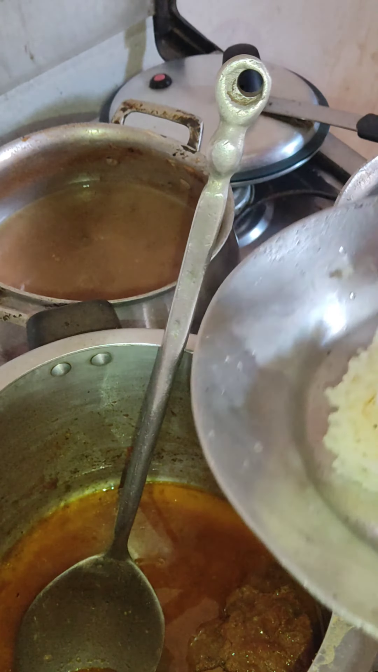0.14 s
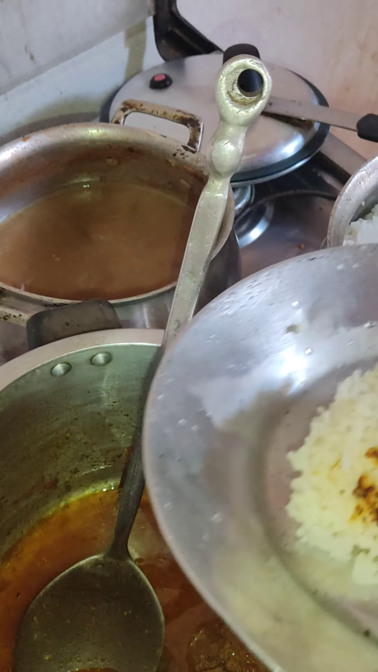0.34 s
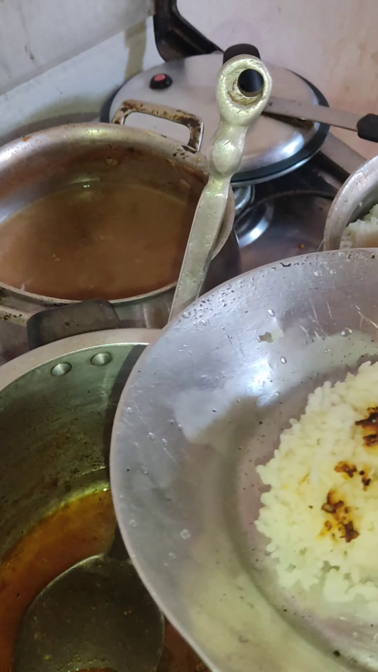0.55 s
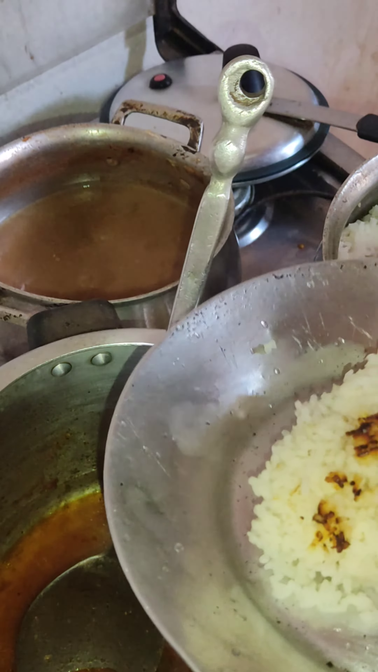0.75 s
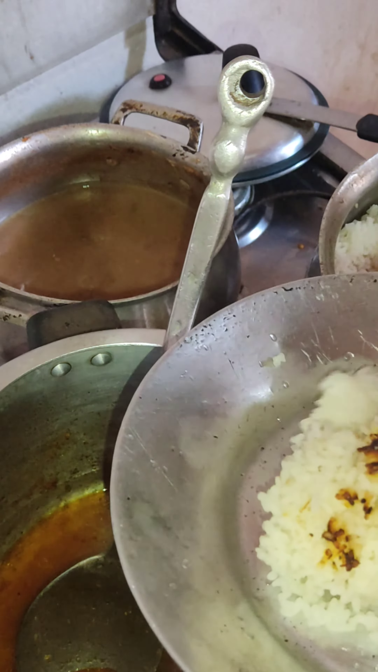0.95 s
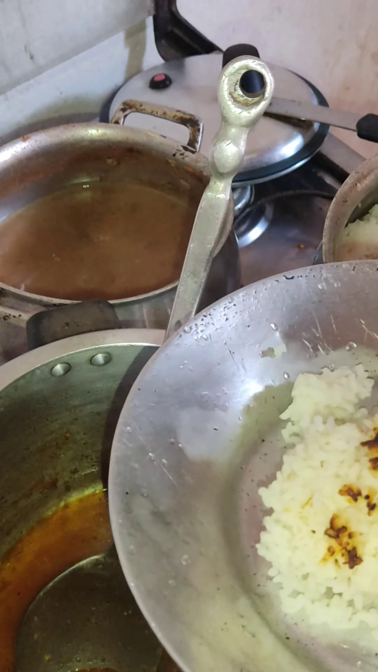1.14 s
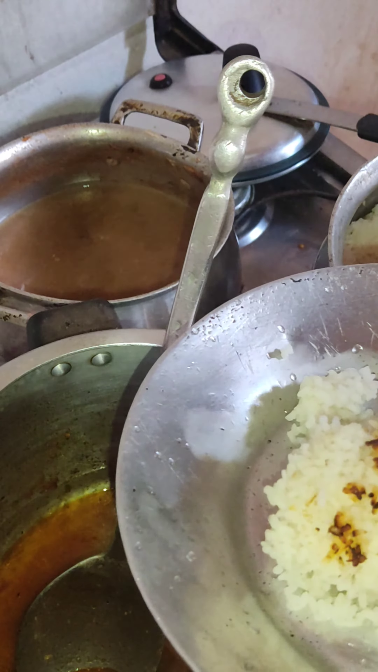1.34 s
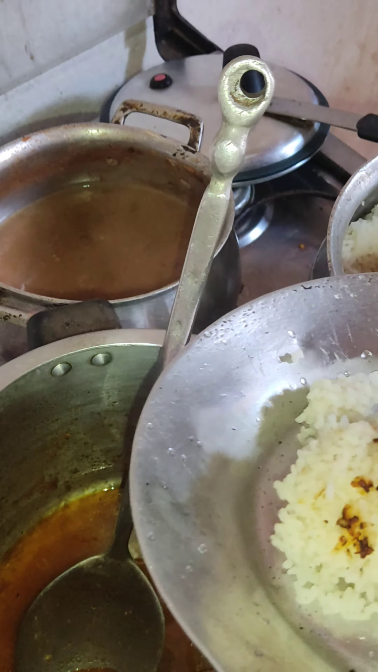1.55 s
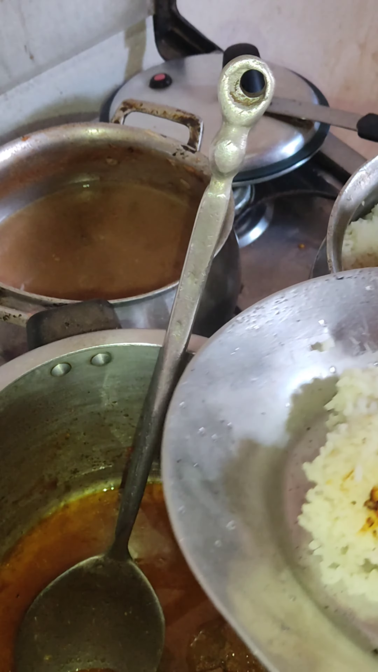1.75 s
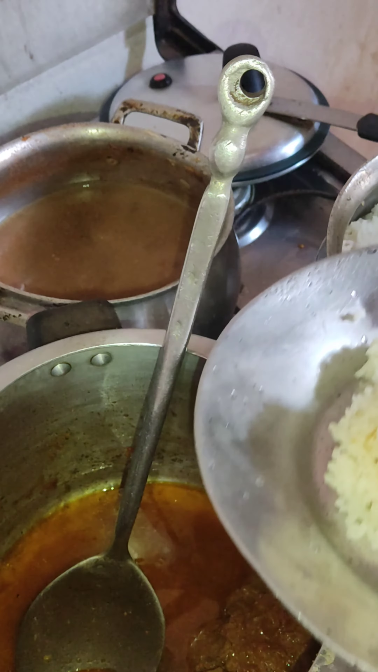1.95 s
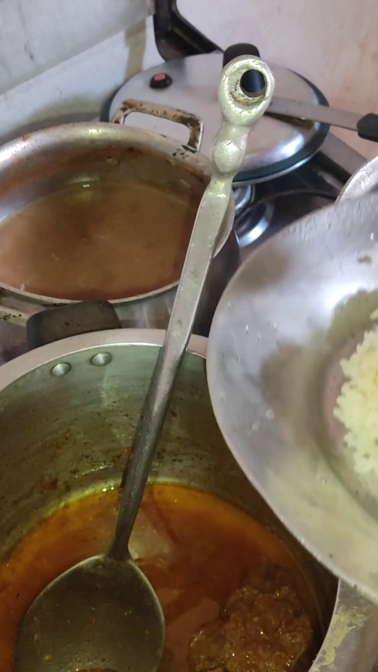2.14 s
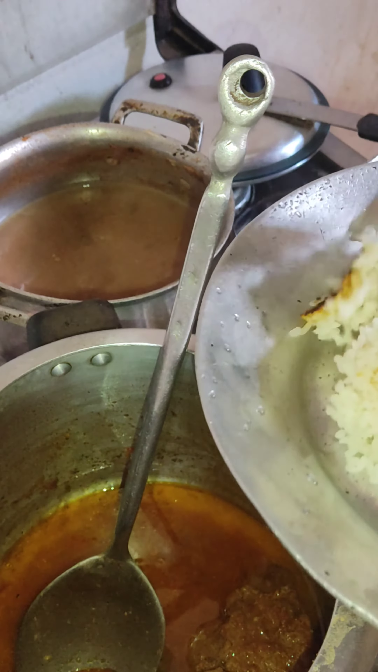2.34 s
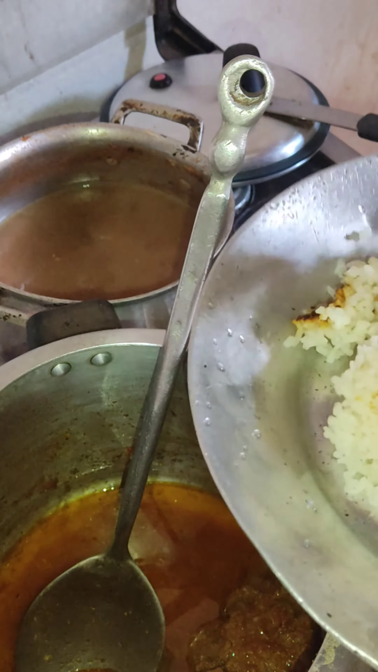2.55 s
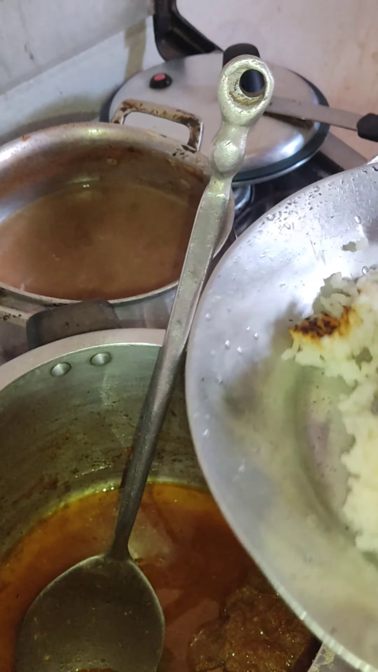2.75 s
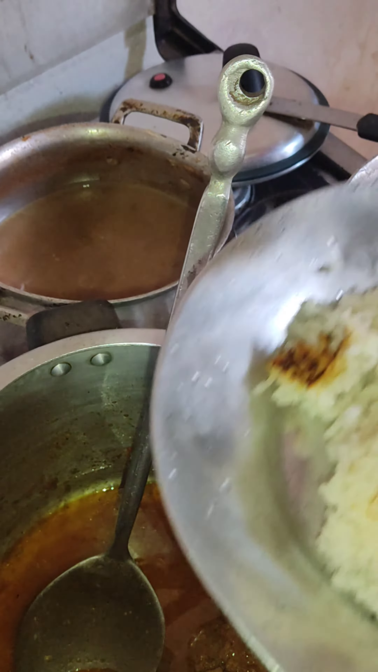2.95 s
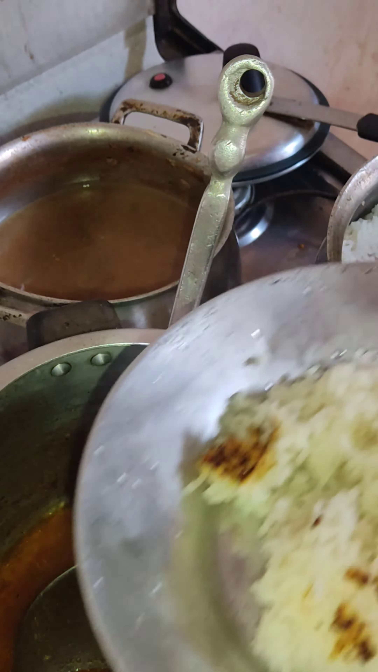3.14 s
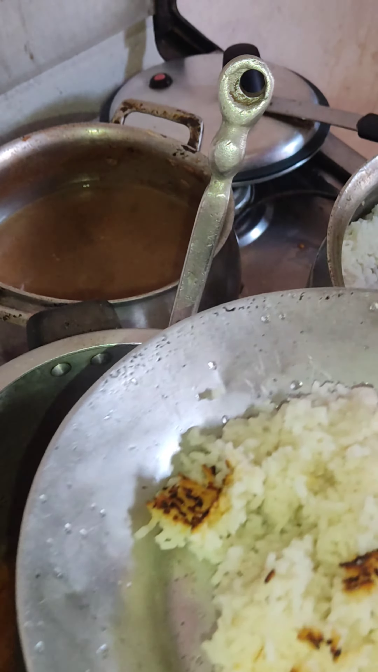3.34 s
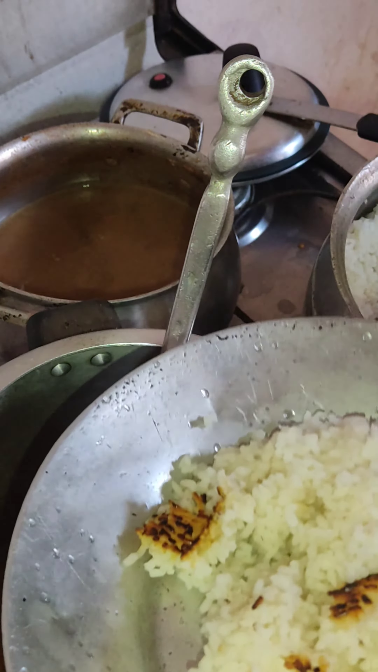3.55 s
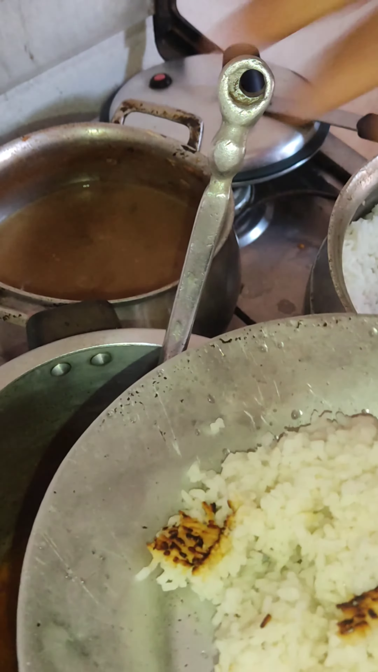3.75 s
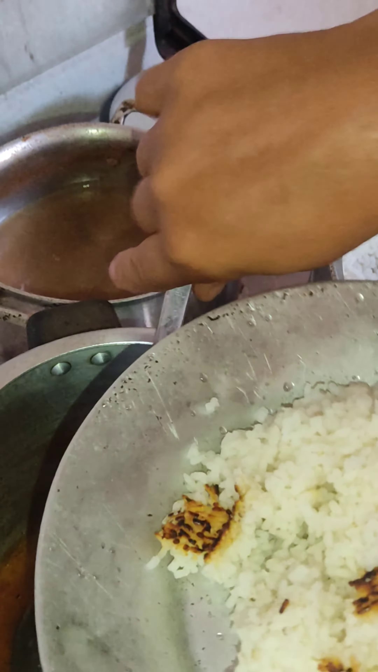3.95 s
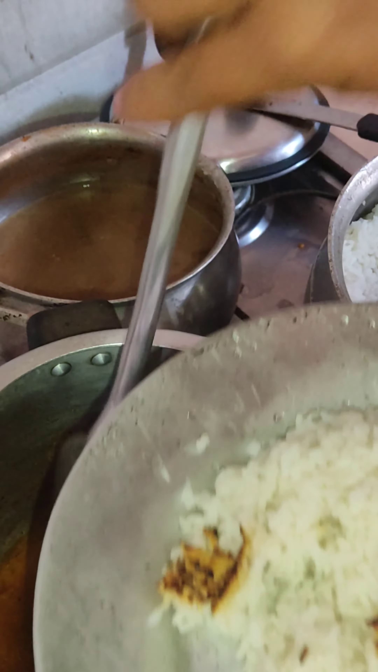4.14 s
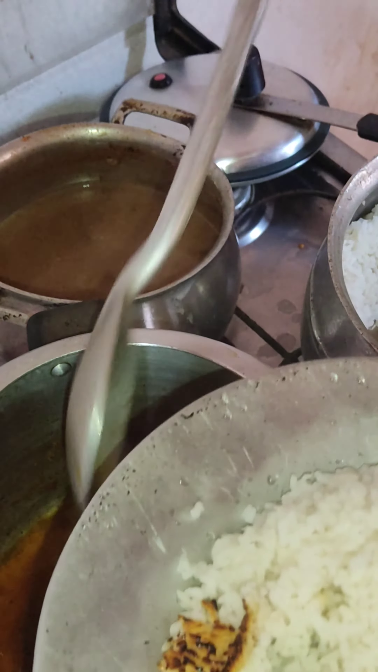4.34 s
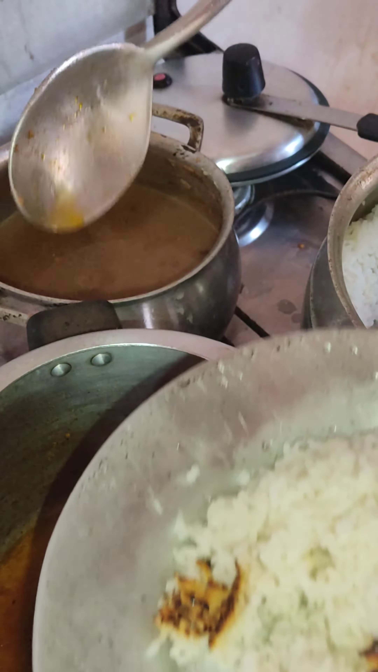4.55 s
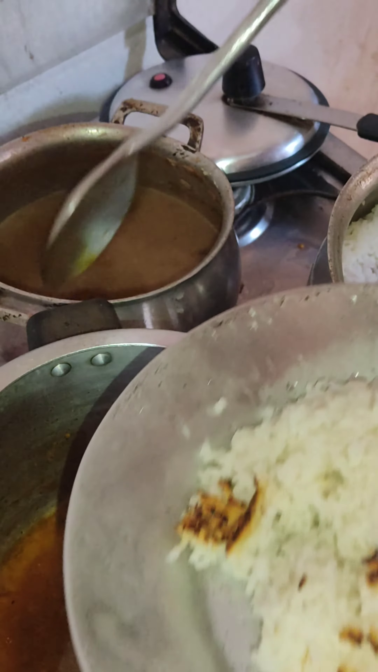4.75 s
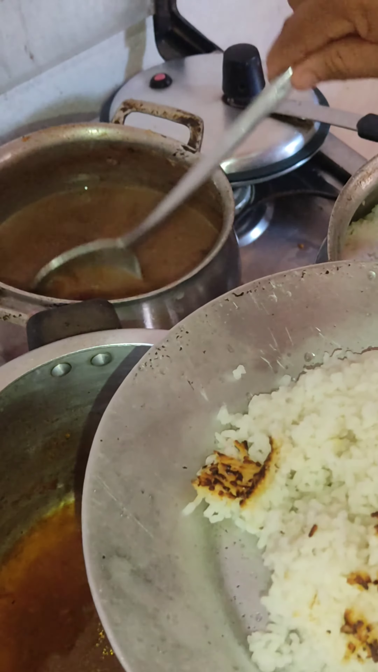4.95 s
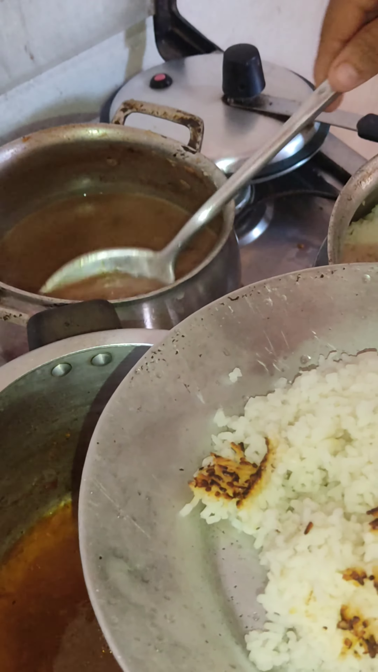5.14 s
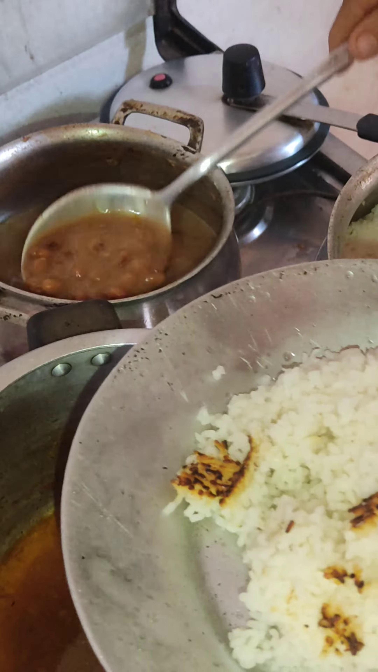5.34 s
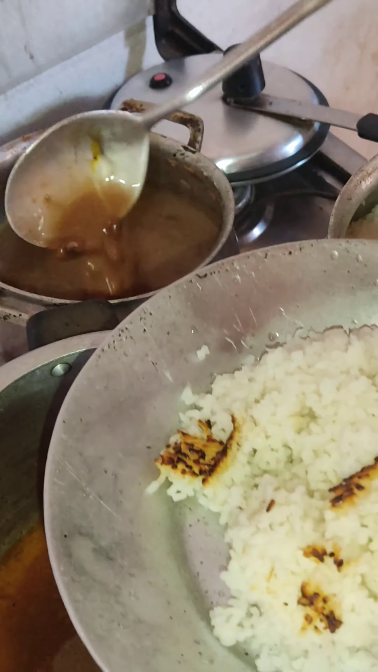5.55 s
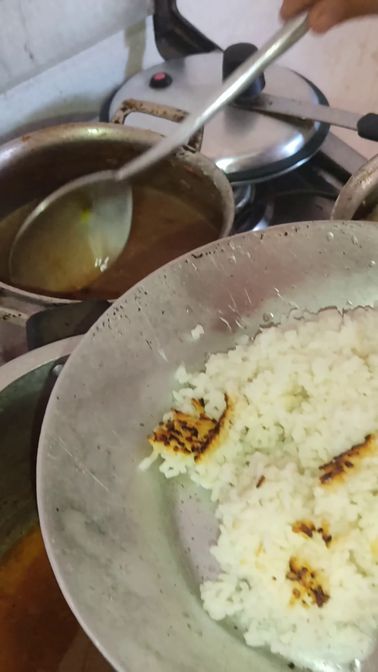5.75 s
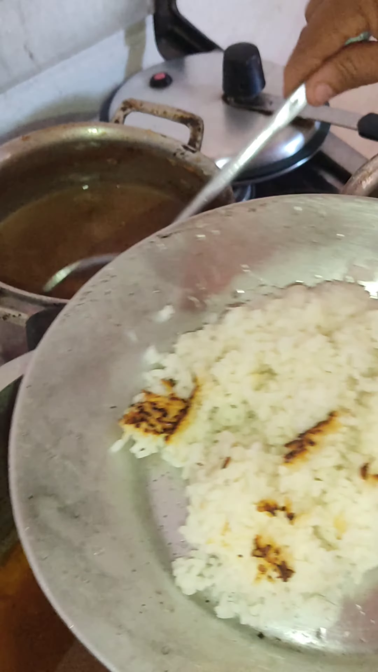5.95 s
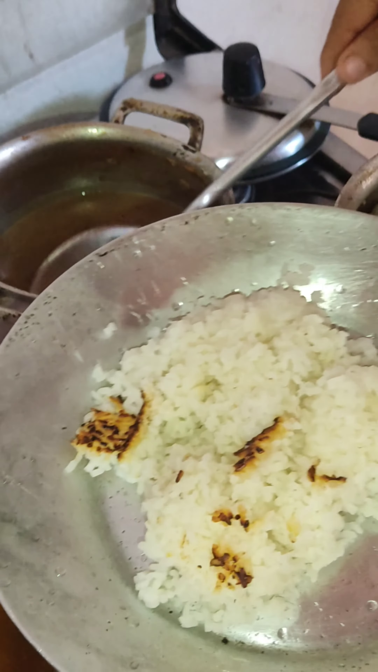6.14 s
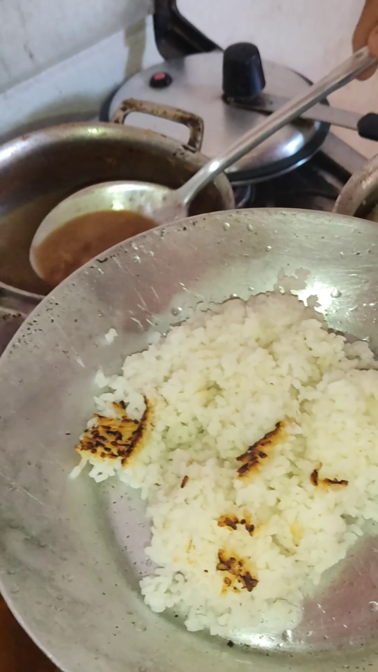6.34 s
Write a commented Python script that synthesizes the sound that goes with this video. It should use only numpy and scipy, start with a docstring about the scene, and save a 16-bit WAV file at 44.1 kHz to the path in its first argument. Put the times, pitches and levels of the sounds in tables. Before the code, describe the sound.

In a small tiled kitchen with a low compressor hum, pans thud softly and shift on the stove while a spoon scrapes faintly. A plate is lightly touched and rice is knocked loose. A bright cluster of spoon clinks rings out, a pan rocks quickly to rest, then a ladle strikes a pot hard, followed by the pot wall and small rim ticks. Close stereo microphone, short bright room tail.

```python
"""A home kitchen: a serving spoon scrapes rice and clinks on a pot, a plate is touched, a ladle rocks its pan,
strikes a stew pot and ticks on the rim. Pans thud and drag on the stove, something squeaks, steam whistles
and a compressor hums. Cookware is beating resonances, resonance-coloured clatter and a raw snap; friction,
steam and air are shaped grainy noise; hum, squeak and pot rings are sines. A tiled-room tail follows the blows."""
import sys
import numpy as np
from scipy import signal
from scipy.fft import rfft, irfft, next_fast_len
from scipy.io import wavfile
from scipy.ndimage import map_coordinates

SR = 44100
rng = np.random.default_rng(int(sys.argv[2]) if len(sys.argv) > 2 else 0)


def transcribe(u):
    """Save the signal u as a 16-bit wav file named by the first command-line argument.

    u: samples, shape (n,) or (channels, n), limited to [-1, 1]; the rate is SR.
    q: integer samples, one column per channel.
    """
    v = np.clip(np.atleast_2d(u).T, -1, 1)
    q = np.round(v * 32767).astype(np.int16)
    wavfile.write(sys.argv[1], SR, q)


N = 281799

# Wavering compressor tones: pitch_hz, level_db
HUM_TONES = [(59.2, -73.5), (118, -90), (527.6, -80), (585.5, -88.5), (701, -90)]
# The strongest compressor tone as it swells: time_s, level_db (before a 5.5 dB lift)
DRONE_SWELL = [(0, -76), (1.3, -102), (1.7, -76.5), (2.5, -76.5), (3.4, -75), (4.5, -78), (5.5, -84.5),
               (6.39, -83.5)]
# Breathy whistles of steam: start_s, rise_s, hold_s, level_db
STEAM_WHISTLES = [(2.002, 0.032, 0.034, -73), (4.474, 0.035, .04, -69)]
# Noise colours of room air and steam: freq_hz, relative_level_db
AIR_COLOUR = [(9, -20.5), (15, 4.5), (68, -24.5), (90, -18), (120, -16.5), (382, -20.5), (685, -25.5),
              (816, -29.5), (1160, -33.5), (3000, -40), (5500, -41.5), (7800, -36), (9300, -40),
              (10200, -51), (12500, -59), (13500, -75.5), (16000, -77.5)]
STEAM_COLOUR = [(3000, -120), (4300, -25), (4900, -12), (5200, -11.5), (5500, -10.5), (6200, -60),
                (8000, -120)]

# The squeak's envelope: start_s, rise_s, hold_s, fade_db_per_s
SQUEAK_SHAPE = (0.34, 0.0071, 0.15, 670)
# The squeak's harmonics: multiple_of_pitch, relative_level_db
SQUEAK_HARMONICS = [(1, 0), (2, -5), (3, -15), (4, -18), (5, -18)]

# Strokes of metal on metal and rice: start_s, rise_s, hold_s, hiss_db, rasp_db
SCRAPE_STROKES = [(0.172, 0.011, 0.051, -71, -70.5), (0.32, 0.02, 0.13, -74, -74),
                  (0.588, 0.0185, 0.099, -71, -82), (0.92, 0.018, 0.09, -66, -64),
                  (1.013, 0.023, 0.092, -66, -63), (1.262, .006, 0.0086, -66.5, -69),
                  (2.109, 0.042, 0.045, -51.5, -56), (2.526, 0.029, 0.085, -63, -76),
                  (2.833, 0.014, 0.063, -65, -66.5), (3.328, 0.013, 0.19, -51.5, -60.5),
                  (3.959, 0.011, 0.004, -54, -60), (4.006, 0.023, 0.01, -59.5, -62.5),
                  (4.053, 0.026, 0.18, -89, -64), (4.24, 0.0048, 0.0073, -57, -76),
                  (5.366, 0.045, 0.07, -63, -59.5), (5.618, 0.012, 0.051, -62, -75.5),
                  (5.85, 0.12, 0.043, -66.5, -73), (6.146, 0.014, 0.2, -71.5, -70.5)]
# Pans shifting on the grate: start_s, rise_s, hold_s, fade_db_per_s, rumble_db, boom_db
PAN_DRAGS = [(0.603, 0.0076, 0.0088, 65, -53.5, -57), (0.888, 0.013, 0.047, 95, -60.5, -60.5),
             (1.01, 0.015, 0.029, 90, -54.5, -72), (1.127, 0.016, 0.02, 88, -62.5, -58.5),
             (1.325, 0.033, 0.019, 131, -60, -68), (1.46, 0.026, 0.0076, 173, -61, -61.5),
             (3.489, 0.02, 0.039, 118, -49, -43.5), (3.568, 0.026, 0.051, 103, -53.5, -57.5),
             (4.003, 0.011, 0.12, 27, -51, -65.5), (4.928, 0.022, 0.013, 140.5, -42.5, -48.5),
             (5.045, 0.02, 0.008, 74, -49, -60)]
# The grate under each near-edge landing: rise_s, hold_s, fade_db_per_s
GRATE_THUMP = (.008, .02, 200)
# Friction colours: freq_hz, relative_level_db
HISS_COLOUR = [(1760, -31), (3000, -4), (4860, -7.5), (5040, -6), (6300, -3.5), (8820, 2.5), (10000, -14),
               (14400, -28.5), (15700, -36.5), (16000, -57.5)]
RASP_COLOUR = [(350, -23), (600, -9.5), (1100, -6.5), (1400, -5), (1800, -6), (2250, -6), (2750, -5),
               (3200, -13.5), (4000, -13.5), (5200, -32.5), (8800, -120)]
RUMBLE_COLOUR = [(110, -44), (160, -3.5), (200, 2), (278, 1.5), (323, -8), (440, -5.5), (900, -18),
                 (1300, -36.5), (2500, -120)]
BOOM_COLOUR = [(30, -79.5), (70, -30.5), (95, -7), (115, 5.5), (140, -4.5), (185, -27.5), (400, -91.5)]

# Likeness of the left and right noise: freq_hz, likeness (0 to 1)
SIDE_LIKENESS = [(30, 0.053), (70, 0.92), (150, 0.82), (300, 0.7), (700, 0.11), (1200, 0.073),
                 (2000, 0.011), (10000, 0.019)]
# How long the tiled room rings, before the tail bends down faster: freq_hz, decay_60db_s
ROOM_DECAY = [(100, 0.16), (500, 0.72), (1200, 0.71), (2500, 0.66), (4000, 0.61), (6500, 0.55),
              (9000, 0.43), (12000, 0.27)]
# Left-right lean of all the cookware: freq_hz, left_over_right_db
COOKWARE_LEAN = [(150, 2), (500, 4), (1000, 4.5), (2000, 0.5), (4000, -2), (8000, -2), (12000, 4)]
# Colour of the clatter and snap in a blow: freq_hz, relative_level_db
CRACK_COLOUR = [(53, -64.5), (90, -15), (597, 0), (1050, 2), (1890, -3), (3050, -6.5), (4140, -14),
                (5610, -12), (5990, -9), (8670, -3), (9670, -17), (15300, -43.5), (16300, -45.5)]

# Blows on each piece: time_s, treble_level_db, middle_over_treble_db, left_over_right_db, bite_hz
# (sides before the cookware lean)
STOVE_THUDS = [(0.2007, -59, 0.9, -17, 7400), (0.611, -59.5, 13, 1, 7950), (0.9183, -37.5, 7.1, -3.5, 2730),
               (1.128, -58, 7, 0, 1230)]
RIM_TICK_BLOWS = [(1.3014, -50, -13.5, -11, 7540), (5.3547, -41, -29, -8, 6230),
                  (5.3807, -41.5, -13, 1, 7100), (5.4251, -33.5, -43, 0, 7760),
                  (5.4392, -38, -17.5, -4, 6300), (5.498, -63, -12, -1, 8050),
                  (5.5513, -37, -18.5, -4, 7840), (5.5767, -46, -20, 10, 8800),
                  (5.6087, -38, -20, -1.5, 6860), (5.6815, -52.5, -6.5, -3, 3830),
                  (5.7214, -47, -18, 1, 8030), (5.7753, -45.5, -18.5, -1.5, 7100),
                  (5.8157, -41.5, -37, -2, 7230), (5.88, -50.5, -16, -7, 7500),
                  (6.0526, -33, -17, -0.5, 7640), (6.0712, -33, -16, -4.5, 7260),
                  (6.3704, -48, -22.5, -3, 8120)]
POT_WALL_BLOWS = [(5.0616, -15, 0, -1, 7520)]
LADLE_STRIKES = [(4.9305, -41, -9.5, 0, 4155), (4.9351, -11, -6.5, 0.27, 4260),
                 (5.2102, -51.5, -13, 13, 7340)]
PLATE_TOUCHES = [(2.415, -34.5, -4.5, -1.5, 4530), (2.434, -43, -9, -3.5, 4530),
                 (2.5975, -51.5, -27, -15, 7940), (3.3423, -43.5, -11.5, -5, 6610),
                 (3.463, -37, -11, 0, 7850)]
GRIPPED_SPOON_TAP = [(1.4721, -36, -5.5, -2, 3950)]
RICE_KNOCKS = [(2.923, -26, -16.5, -1.15, 9100), (2.9348, -26, -19.5, 0.1, 8800),
               (2.9544, -40.5, -21.5, -1.1, 8420)]
SPOON_CLINKS = [(3.4925, -14.5, -6, 2, 6000), (3.495, -8, -4.5, 1.5, 8710), (3.5142, -24, 4.5, -3.5, 7040),
                (3.5335, -25, -1, -1, 7200), (3.5548, -12.5, -7.5, 3.5, 6740), (3.5867, -17, -5, -7, 5980),
                (3.6069, -23.5, 0.5, -1, 6280), (3.623, -28, 6.5, 1.5, 7400), (3.647, -40, 10, -0.5, 6100)]
# The rocking pan's landings, far edge then near edge: time_s, treble_level_db
FAR_LANDINGS = [(3.9759, -36), (4.081, -36), (4.184, -37.5), (4.2804, -43.5), (4.3786, -52.5)]
NEAR_LANDINGS = [(4.0216, -32), (4.1429, -34), (4.2445, -35.5), (4.351, -39), (4.442, -44.5)]
# A pot's low rings: start_s, hold_until_stilled_s, level_db, pitch_hz
POT_RINGS = [(0.611, 0.017, -54, 285), (0.899, 0.0056, -58, 947), (1.473, 0.015, -59.5, 455),
             (3.497, 0.11, -41, 454)]

# Resonances of each piece: pitch_hz, width_hz (scaled per piece when it decays), relative_level_db
STOVE_MODES = [(262, 110, 0.5), (618, 68, 6), (984, 26.3, -16), (1670, 330, 0.5), (2240, 150, -18),
               (2430, 34, -12), (2650, 9.8, -4), (4000, 83, -5), (4880, 39, -9), (5320, 42, -8),
               (7260, 190, -8), (8100, 71, -28)]
RIM_MODES = [(1560, 72, 8), (2040, 220, 17.5), (2620, 72, 11), (3900, 99, -17.5), (5700, 340, -14),
             (6760, 206, -33), (7000, 220, -19), (8530, 630, -23), (9700, 98, -19), (10200, 100, -10)]
POT_WALL_MODES = [(295, 37, -8), (544, 3.6, -5), (752, 29, 0), (1170, 11, 1), (1280, 32, -8),
                  (1540, 170, 6.5), (1625, 34, -8), (1890, 40, -6.5), (2196, 22, -5), (2520, 35, -17),
                  (2880, 28, -11), (3400, 63, -15), (4530, 190, -5), (4610, 80, -12), (5110, 83, -2.5),
                  (5540, 50, -6), (5710, 65, 0.5), (6000, 60, -13), (7300, 62, -11), (7750, 100, -4),
                  (8200, 110, -16), (8400, 32, -6), (9000, 40, -4.5), (10100, 160, -34), (10750, 36, -17)]  # the side of the stew pot
LADLE_MODES = [(263, 48, -16.5), (1104, 30, 2.5), (1144, 24, 0), (1163.5, 11, -1), (1557, 29, -6),
               (1748, 130, 2.5), (1830, 28, -1), (2040, 18, -11), (2606, 17, -7), (2930, 36, -19),
               (4240, 48, -2), (4530, 40, -17.5), (4820, 32, -14.5), (5260, 63, -10), (6200, 20, -8),
               (6600, 24, -14.5), (6840, 25, -17), (7500, 22, -23), (7760, 52, -8), (8800, 35, -29.5),
               (8400, 90, -38.5), (8654, 78, -26.5), (8600, 30, -26), (9450, 42, -37), (10300, 39, -41),
               (11700, 34, -30), (11470, 51, -47), (13000, 140, -41), (13900, 90, -35.5)]
PAN_MODES = [(788, 43, -19), (1020, 120, -10.5), (1145, 76, -2), (2070, 45, -16.5), (2420, 150, -6.5),
             (3080, 36, -26.5), (3520, 77, -15), (4200, 240, -8), (4950, 130, -17), (7150, 218, -9),
             (8200, 100, -16), (9400, 65, -20.5)]
PAN_LIP_MODES = [(593, 220, -9), (2270, 260, -1.5), (4150, 180, -5.5), (5600, 400, -15), (7240, 240, -7),
                 (8600, 440, -11)]
PLATE_MODES = [(1724, 54, -2), (2490, 110, -7), (3400, 120, -11), (4000, 33, -14.5), (4410, 60, -6),
               (4640, 60, -6.5), (5170, 51, -9), (5700, 130, -5.5), (6520, 130, -4), (6980, 70, -2.5),
               (7460, 580, -5), (8230, 140, -8.5), (9200, 29, -14.5), (10000, 140, -12), (10130, 61, -28),
               (11800, 70, -40), (13180, 43, -30.5), (12800, 40, -37.5)]
GRIPPED_SPOON_MODES = [(480, 74, -1), (1355, 24, -8), (1650, 200, -11), (2464, 58, -5.5), (3710, 60, -4.5),
                       (5030, 70, -11), (7210, 200, -4), (7810, 180, -3), (8250, 130, -5), (8750, 110, 2),
                       (9240, 220, -3), (11000, 200, -26)]  # held tight: the treble blurs
LADEN_SPOON_MODES = [(2500, 120, 5), (3700, 29, -11), (3920, 59, -15.5), (5000, 35, -20.5),
                     (5200, 140, -11.5), (5870, 31, -13), (6180, 38, -9), (6210, 42, -14.5),
                     (6400, 35, -16.5), (7320, 34, -22), (7200, 33, -19.5), (8770, 34, -1),
                     (8800, 49, -8.5), (9240, 140, -19), (9490, 56, -20), (9793, 30, -9.5),
                     (10600, 140, -11.5), (12300, 60, -28), (12900, 68, -16), (13700, 110, -35)]  # with rice on it
SPOON_MODES = [(120, 89, -7), (475, 23, -2.5), (597.6, 40, -8.5), (804, 74, -13.5), (899.5, 24, -15),
               (1010, 60, -7.5), (1364, 48, -5.5), (1420, 58, -6.5), (1830, 210, -8), (2610, 120, -15.5),
               (2496, 39, -7), (2537, 17, -8), (2624, 90, -13.5), (3420, 80, -15), (3340, 90, -14),
               (3694, 29, -6.5), (3780, 76, -9), (3790, 130, -14.5), (5080, 60, -18.5), (5026, 46, -14.5),
               (4840, 31, -17.5), (5560, 25, -12.5), (5780, 50, -16), (6110, 31, -1), (6590, 130, -10),
               (7080, 48, 2), (7100, 31, -15.5), (7350, 30.7, -3), (7700, 22, -7), (8220, 50, -6.5),
               (8090, 120, -3), (8750, 190, 2.5), (8980, 120, -14), (9380, 560, 0), (10850, 49, -28.5),
               (10880, 41, -24.5), (12470, 140, -25.5), (11510, 100, -20.5), (12600, 99, -24.5),
               (13900, 120, -29)]

AIR_DB, DRONE_HZ, WHISTLE_FADE_DB_PER_S = -60.5, 466, 92
SQUEAK_DB, SQUEAK_HZ, SQUEAK_SAG_HZ_PER_S = -73.5, 1065, 700
SQUEAK_FLUTTER_DB = 3
STROKE_FADE_DB_PER_S = 166
THUMP_RUMBLE_DB, THUMP_BOOM_DB = -19, -26.5  # over the near-edge tick
POT_RISE_S, POT_FADE_DB_PER_S = 0.0027, 307
CLONK = (2.6, 2.24, 1300)  # far edge: middle_over_treble_db, left_over_right_db, bite_hz
TICK = (-2, -1.2, 5400)  # near edge: the same columns
CLUSTER_SCATTER_RAD = 0.8
TAIL_BEND_DB_PER_S2 = 90  # the room tail fades ever faster
TOP_HZ = 16400


def amp(db):
    """Gain of a level in dB."""
    return 10 ** (np.asarray(db) / 20)


def unit(x):
    """Bring x to rms 1."""
    return x / np.sqrt(np.mean(x ** 2) + 1e-20)


def along(points, hz):
    """Read a (Hz, value) curve on a log frequency axis."""
    f, v = np.transpose(points)
    return np.interp(np.log(hz + 1), np.log(f + 1), v)


def wobble(rate):
    """A smooth random curve with rate knots a second."""
    knots = rng.standard_normal(int(N * rate / SR) + 4)
    return map_coordinates(knots, [np.arange(N) * rate / SR])


def filtered(x, response):
    """Shape x by a response given as a function of frequency."""
    n = x.shape[-1]
    m = next_fast_len(n + 4096)
    return irfft(rfft(x, m) * response(np.fft.rfftfreq(m, 1 / SR)), m)[..., :n]


def swells(start_s, rise_s, hold_s, fade_db, level_db):
    """Sum of envelopes: a rise, a hold, then a fade of fade_db a second; levels lie below 0 dB."""
    columns = (start_s, rise_s, hold_s, fade_db, level_db)
    start_s, rise_s, hold_s, fade_db, drop_db = (np.abs(np.reshape(v, (-1, 1))) for v in columns)
    t = np.arange(N) / SR - start_s
    rise = np.clip(t / rise_s, 0, 1) ** 2
    fade = amp(-drop_db - fade_db * np.clip(t - rise_s - hold_s, 0, None))
    return (rise * fade).sum(axis=0)


def rush(colour, grain_db, n=N):
    """Coloured stereo noise of rms 1 in 64-sample grains of random size, most alike in the bass."""
    grain = amp(grain_db * rng.standard_normal(n // 64 + 1).repeat(64)[:n])
    pair = rng.standard_normal((2, n)) * grain

    def mid_and_side(hz):
        turn = np.arccos(np.clip(along(SIDE_LIKENESS, hz), -1, 1)) / 2
        return amp(along(colour, hz)) * [np.cos(turn), np.sin(turn)]

    mid, side = filtered(pair, mid_and_side)
    return unit(np.array([mid + side, mid - side]))


def kitchen(x):
    """A fresh noise tail of the tiled room: each frequency dies at its own speed."""
    white = rush([(20, 0.0011), (20000, 0.0092)], 0, n=SR * 3 // 4)
    hz, t, z = signal.stft(white, SR, nperseg=256)
    fade_db = -60 * t / along(ROOM_DECAY, hz)[:, None] - TAIL_BEND_DB_PER_S2 * t ** 2
    tail = signal.istft(z * amp(fade_db), SR, nperseg=256)[1]
    tail = np.pad(tail, ((0, 0), (200, 0))) / np.linalg.norm(tail[0])  # starts 200 samples late
    return signal.fftconvolve(x, tail, axes=1)


def background():
    """Room air as noise, a compressor as wavering sines, steam as narrow breathy noise."""
    t = np.arange(N) / SR
    hum = sum(amp(db + 3 + 3.0 * wobble(4.4)) * np.sin(2 * np.pi * hz * t + 0.38 * wobble(5.8))
              for hz, db in HUM_TONES)
    drone_db = np.interp(t, *np.transpose(DRONE_SWELL)) + 5.5 + 1.2 * wobble(9.4)
    drone = amp(drone_db) * np.sin(2 * np.pi * DRONE_HZ * t + 0.4 * wobble(0.93))
    *shape, level_db = np.transpose(STEAM_WHISTLES)
    steam = swells(*shape, WHISTLE_FADE_DB_PER_S, level_db) * rush(STEAM_COLOUR, 1.1)
    air = amp(AIR_DB + wobble(1.7)) * rush(AIR_COLOUR, 0.65) * amp([[1.2], [-1.2]])
    return air + hum + drone + steam


def squeak():
    """A thin, falling squeak: harmonics rough in pitch and level, with plenty of room on them."""
    since_start = np.arange(N) / SR - SQUEAK_SHAPE[0]
    pitch = (SQUEAK_HZ - SQUEAK_SAG_HZ_PER_S * since_start) * (1 + 0.021 * wobble(153.0))
    phase = 2 * np.pi * np.cumsum(pitch) / SR
    voice = sum(amp(db) * np.sin(k * phase) for k, db in SQUEAK_HARMONICS)
    tone = swells(*SQUEAK_SHAPE, SQUEAK_DB) * amp(SQUEAK_FLUTTER_DB * wobble(62.4)) * voice
    return tone + amp(1.0) * kitchen(np.array([tone, tone]))[:, :N]


def scrapes():
    """Strokes hiss and rasp in fine grains as the edge catches and slips."""
    catch = unit(amp(3 * wobble(140) + 2 * wobble(18)))
    *shape, hiss_db, rasp_db = np.transpose(SCRAPE_STROKES)
    hiss = swells(*shape, STROKE_FADE_DB_PER_S, hiss_db) * rush(HISS_COLOUR, 0.85)
    rasp = swells(*shape, STROKE_FADE_DB_PER_S, rasp_db) * rush(RASP_COLOUR, 1.1)
    return catch * (hiss + rasp)


def drags():
    """Dragged pans rumble in lumps and the counter booms; near-edge landings thump the grate."""
    thumps = [(s, *GRATE_THUMP, db + THUMP_RUMBLE_DB, db + THUMP_BOOM_DB) for s, db in NEAR_LANDINGS]
    *shape, rumble_db, boom_db = np.transpose(list(PAN_DRAGS) + thumps)
    lumps = unit(amp(1.0 * wobble(30)) * rush(RUMBLE_COLOUR, 0.65))
    moving = swells(*shape, rumble_db) * lumps + swells(*shape, boom_db) * rush(BOOM_COLOUR, 0.23)
    return moving * amp([[1.8], [-1.8]])


def friction():
    """Scrapes and drags, each with its own share of the room."""
    stroke, drag = scrapes(), drags()
    return stroke + drag + kitchen(amp(-6) * stroke + amp(-10) * drag)[:, :N]


def modal_ring(body, weight, narrow, t):
    """Dented metal: every resonance is a cluster of five close, beating, decaying sines."""
    hz, width, level = np.tile(np.transpose(body), 5)[:, :, None]
    apart = np.repeat([-2.3, -0.99, -0.1, 0.98, 2], len(body))[:, None]
    scatter_db = rng.normal(0, 0.37, (2, len(hz), 1))
    size = weight(hz) * amp(level + scatter_db) * np.sqrt(width / 50) * amp(-2.2 * apart ** 2)
    split = hz + width * (0.52 * apart + 0.12 * rng.standard_normal(hz.shape))
    # the two sides hear short waves out of step, while a cluster starts nearly in step
    likeness = np.clip(along(SIDE_LIKENESS, hz[:len(body)]), -1, 1)
    sides = rng.normal(0, 1, (2, len(body), 1)) * np.arccos(likeness)
    start_phase = np.tile(rng.uniform(0, 2 * np.pi, (len(body), 1)) + sides, (1, 5, 1))
    phase = start_phase + CLUSTER_SCATTER_RAD * rng.standard_normal(size.shape)
    decay = np.exp(-np.pi * width * narrow * t)
    return (size * decay * np.sin(2 * np.pi * split * t + phase)).sum(axis=1)


def clatter_colour(body, gap_db):
    """Clatter gathers round the strong resonances and is weaker between them."""
    hz, width, level = np.transpose(body)[:, :, None]
    grid = np.arange(0, SR / 2, 10)
    nearness = 1 / (1 + ((grid - hz) / (width + 0.0034 * hz)) ** 4)
    crowding = (amp(level - along(CRACK_COLOUR, hz)) ** 2 * nearness).sum(axis=0)
    gain = np.sqrt(crowding / np.mean(crowding[grid < 10000]) + amp(gap_db) ** 2)
    return lambda f: np.interp(f, grid, gain)


def struck(blows, body, bass_db, ring_db, crack_db, crack_s, snap_db, bite_db, gap_db, air_db,
           room_db, narrow, rise_s, snap_s=0.011):
    """Each blow rings the body, clatters and snaps; crack_s and snap_s are 60 dB falls; the room answers."""
    out, t = np.zeros((2, N + 2 * SR)), np.arange(SR // 5) / SR
    colour = clatter_colour(body, gap_db)
    for s, db, middle_db, pan_db, bite_hz in blows:
        tilt = [(350, middle_db + bass_db), (1000, middle_db), (2200, middle_db),
                (4500, 0.00063), (9300, 0.0018), (10500, air_db)]
        weight = lambda f: amp(along(tilt, f))
        # one band near bite_hz is raised or lowered in the crack
        bite = lambda f: amp(bite_db / (1 + ((f - bite_hz) / (0.028 * bite_hz)) ** 2))
        ring = modal_ring(body, weight, narrow, t)
        noise = filtered(rush(CRACK_COLOUR, 2, n=len(t)), lambda f: weight(f) * bite(f))
        clatter = filtered(noise, colour) * amp(-60 * t / crack_s)
        snap = noise * amp(snap_db - 60 * t / snap_s)
        onset = 1 - np.exp(-(t / rise_s) ** 2)
        force = amp(db) * amp([[pan_db / 2], [-pan_db / 2]]) * onset
        metal = force * (amp(ring_db) * ring + amp(crack_db) * clatter)
        bare_snap = force * amp(crack_db) * snap
        # the room hears the snap through the metal
        echo = kitchen(metal + 1.3 * filtered(bare_snap, colour))
        start = round(s * SR) - 90  # the onset begins 90 samples ahead of the listed time
        out[:, start:start + len(t)] += metal + bare_snap
        out[:, start:start + echo.shape[1]] += amp(room_db) * echo
    return out[:, :N]


def stove():
    """Dull thuds: resonances kept low under the crack."""
    return struck(STOVE_THUDS, STOVE_MODES, bass_db=0.5, ring_db=-23.0, crack_db=-2.5, crack_s=0.036,
                  snap_db=0.0, bite_db=14, gap_db=-2.0, air_db=-15, room_db=-5.5, narrow=0.58, rise_s=0.0018)


def pot_hum():
    """A pot's low rings: sines with wavering phase, held and then quickly stilled."""
    t = np.arange(N) / SR
    return sum(swells(s, POT_RISE_S, hold_s, POT_FADE_DB_PER_S, db)
               * np.sqrt(2) * np.sin(2 * np.pi * hz * t + 0.37 * wobble(25))
               for s, hold_s, db, hz in POT_RINGS)


def plate():
    """Touches on a plate: bright, bass-light blows with a strong room answer."""
    return struck(PLATE_TOUCHES, PLATE_MODES, bass_db=-9.0, ring_db=-13.0, crack_db=-4.5, crack_s=0.057,
                  snap_db=-9.5, bite_db=10.0, gap_db=-0.5, air_db=-6.5, room_db=1.36, narrow=0.46,
                  rise_s=0.0033)


def rocking_pan():
    """The pan rocks to rest, landing in turn on its far edge (a clonk) and near edge (a tick)."""
    clonks = struck([(s, db, *CLONK) for s, db in FAR_LANDINGS], PAN_MODES, bass_db=11, ring_db=2.0,
                    crack_db=-2.0, crack_s=0.028, snap_db=2, bite_db=2.5, gap_db=2.5, air_db=-5,
                    room_db=-11.5, narrow=0.48, rise_s=0.0089)
    ticks = struck([(s, db, *TICK) for s, db in NEAR_LANDINGS], PAN_LIP_MODES, bass_db=9.5, ring_db=-4.5,
                   crack_db=3.0, crack_s=0.032, snap_db=8.5, bite_db=-17.0, gap_db=0.5, air_db=0.5,
                   room_db=-6.0, narrow=0.69, rise_s=0.0066)
    return clonks + ticks


def ladle_and_stew_pot():
    """The ladle rings under a long crack, the pot's side answers a blow and the rim ticks."""
    ladle = struck(LADLE_STRIKES, LADLE_MODES, bass_db=-10.5, ring_db=-3.0, crack_db=-6.0, crack_s=0.16,
                   snap_db=12, bite_db=-11.0, gap_db=0.7, air_db=-4.0, room_db=-9.5, narrow=0.93,
                   rise_s=0.0031, snap_s=0.016)
    wall = struck(POT_WALL_BLOWS, POT_WALL_MODES, bass_db=-7.0, ring_db=-13.5, crack_db=-7, crack_s=0.058,
                  snap_db=4.0, bite_db=12.0, gap_db=0.0, air_db=1.5, room_db=-7.0, narrow=1.2,
                  rise_s=0.00227)
    rim = struck(RIM_TICK_BLOWS, RIM_MODES, bass_db=16.0, ring_db=-13.0, crack_db=-3, crack_s=0.049,
                 snap_db=7.0, bite_db=9.5, gap_db=-1.5, air_db=2.5, room_db=-1.5, narrow=2.4, rise_s=0.0029)
    return ladle + wall + rim


def spoon():
    """The serving spoon struck free, gripped or laden: its hold and load change the resonances."""
    free = struck(SPOON_CLINKS, SPOON_MODES, bass_db=-9.5, ring_db=-13.0, crack_db=-4.5, crack_s=0.036,
                  snap_db=0.0, bite_db=13.0, gap_db=-5.5, air_db=9.0, room_db=-4.0, narrow=0.96,
                  rise_s=0.0023, snap_s=0.0066)
    gripped = struck(GRIPPED_SPOON_TAP, GRIPPED_SPOON_MODES, bass_db=4.5, ring_db=-9.0, crack_db=-4.5,
                     crack_s=0.069, snap_db=2, bite_db=8, gap_db=-4.5, air_db=10.5, room_db=-5.0,
                     narrow=0.83, rise_s=0.0034)
    laden = struck(RICE_KNOCKS, LADEN_SPOON_MODES, bass_db=-1.5, ring_db=-10.0, crack_db=0.0, crack_s=0.062,
                   snap_db=3.5, bite_db=2.0, gap_db=-0.5, air_db=-3.9, room_db=-2.0, narrow=1.0,
                   rise_s=0.0036)
    return free + gripped + laden


def cookware():
    """Every struck piece together, leaning left or right by frequency."""
    metal = stove() + pot_hum() + plate() + rocking_pan() + ladle_and_stew_pot() + spoon()
    return filtered(metal, lambda hz: amp(along(COOKWARE_LEAN, hz) * [[.5], [-.5]]))


def scene():
    """The whole kitchen, from the background to the cookware."""
    return background() + squeak() + friction() + cookware()


def record(dry):
    """A sharp cut of everything above the band limit."""
    return filtered(dry, lambda hz: hz < TOP_HZ)


dry = scene()
out = record(dry)
transcribe(out)
```